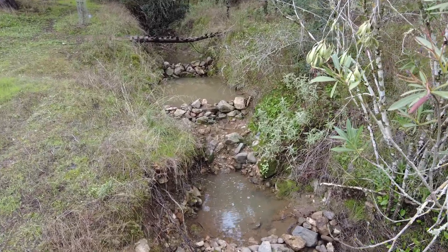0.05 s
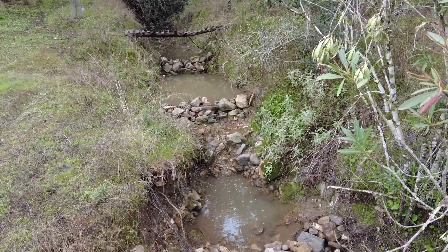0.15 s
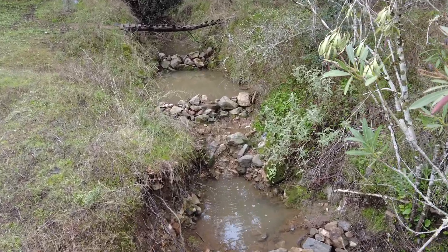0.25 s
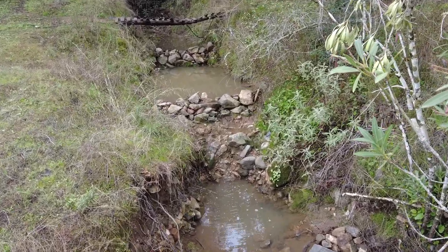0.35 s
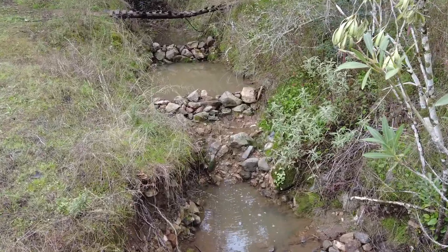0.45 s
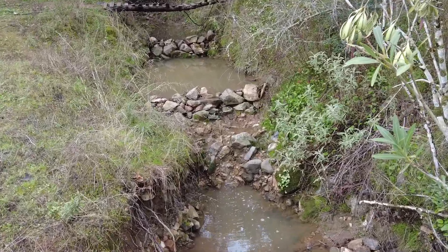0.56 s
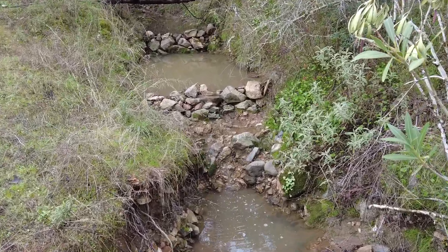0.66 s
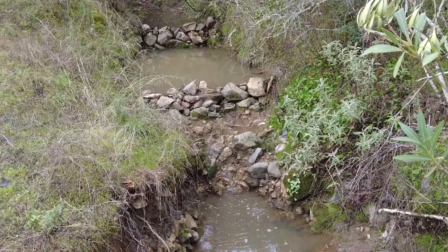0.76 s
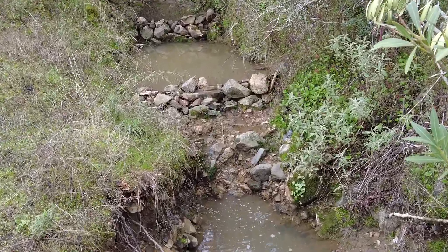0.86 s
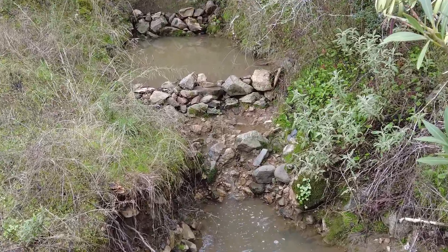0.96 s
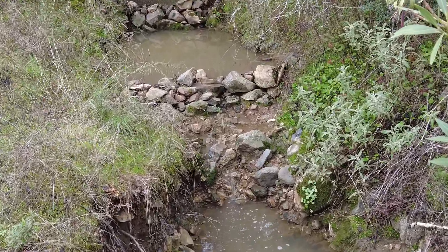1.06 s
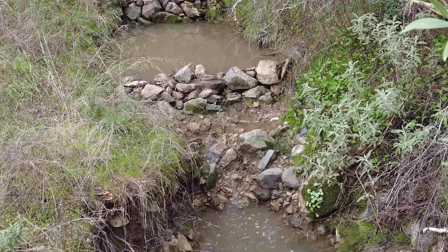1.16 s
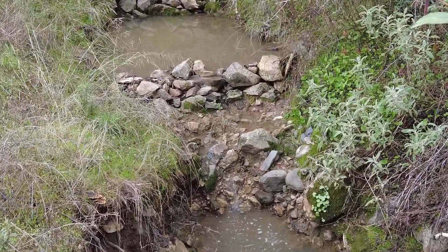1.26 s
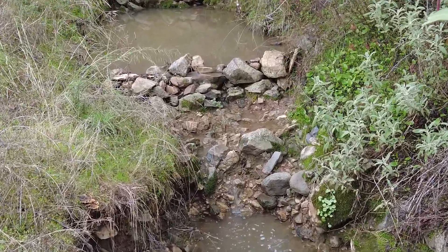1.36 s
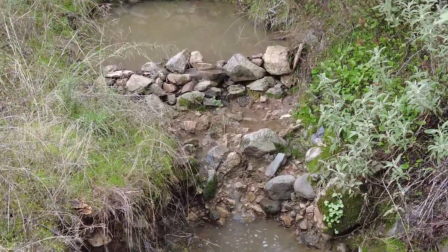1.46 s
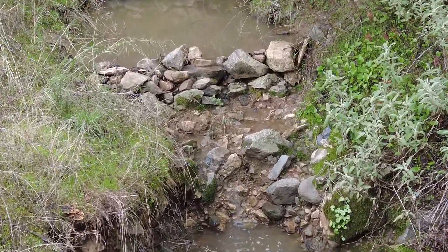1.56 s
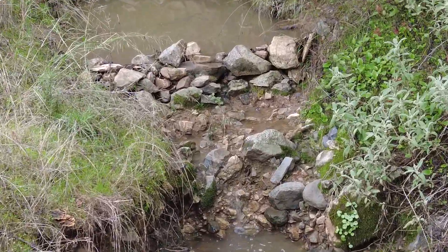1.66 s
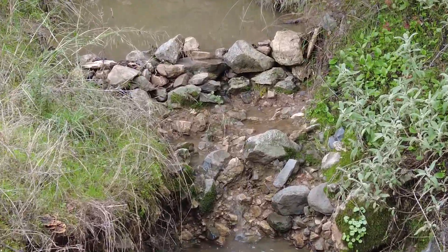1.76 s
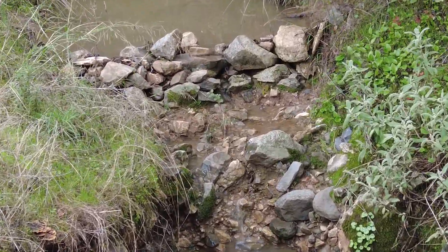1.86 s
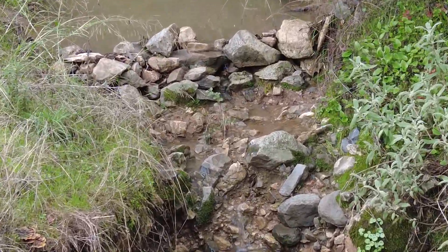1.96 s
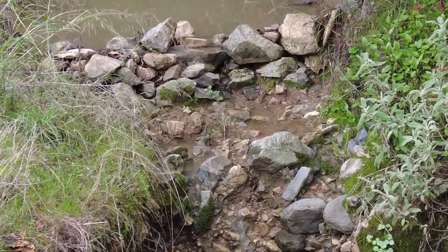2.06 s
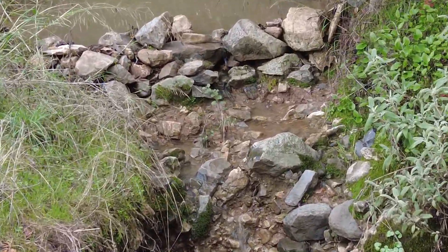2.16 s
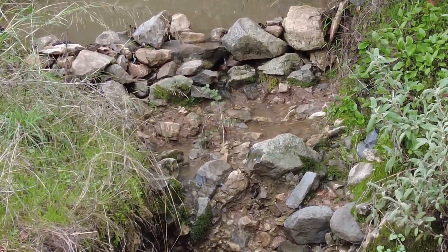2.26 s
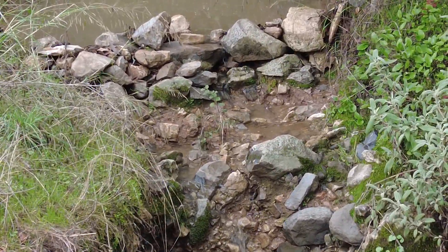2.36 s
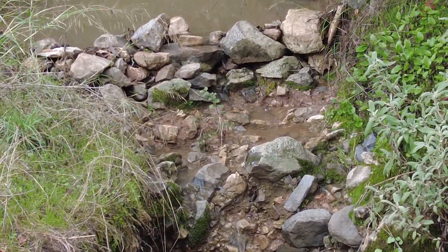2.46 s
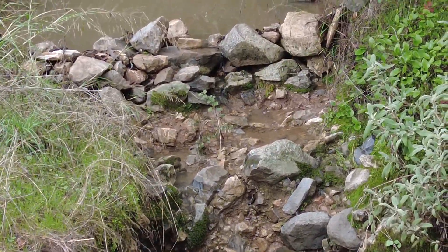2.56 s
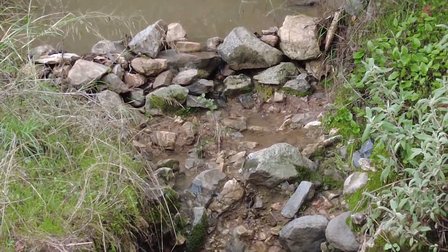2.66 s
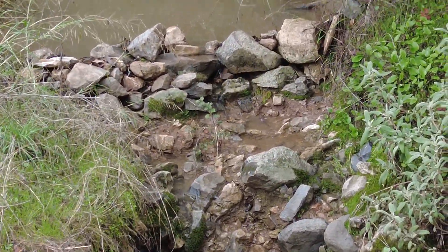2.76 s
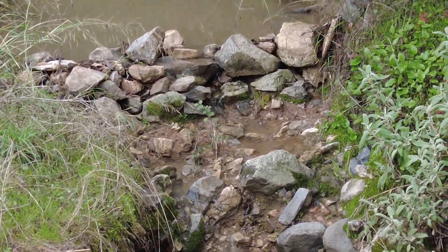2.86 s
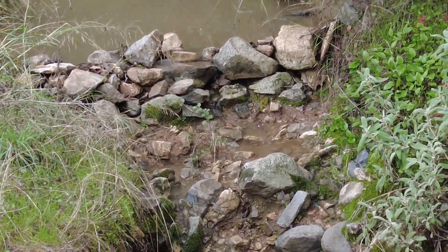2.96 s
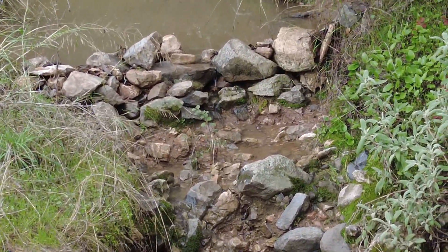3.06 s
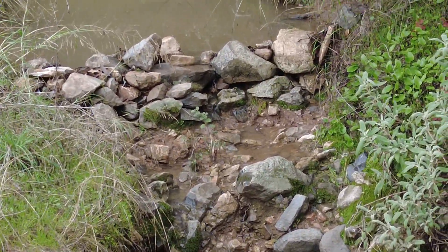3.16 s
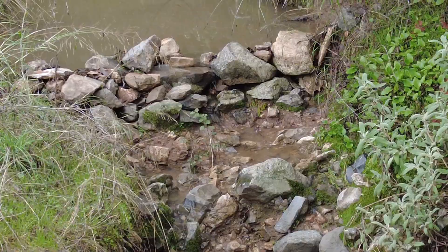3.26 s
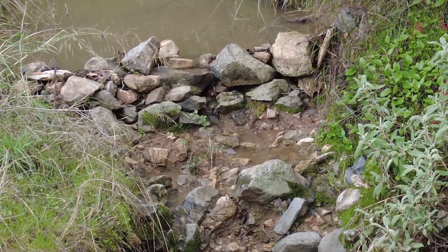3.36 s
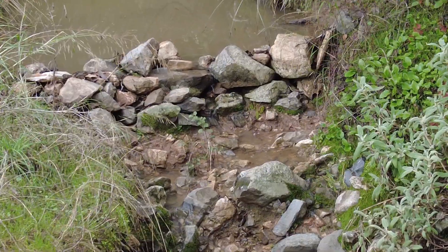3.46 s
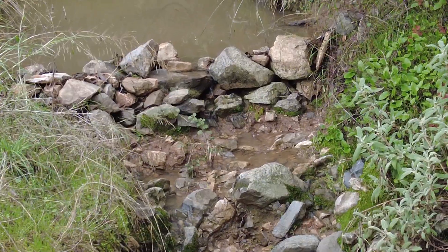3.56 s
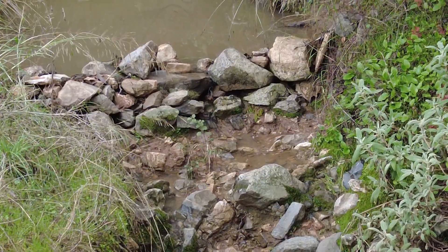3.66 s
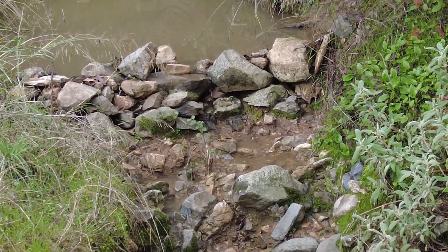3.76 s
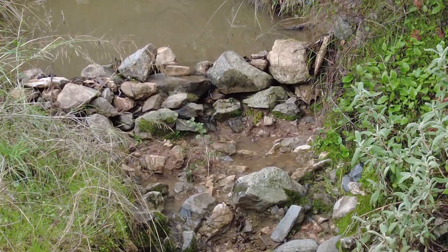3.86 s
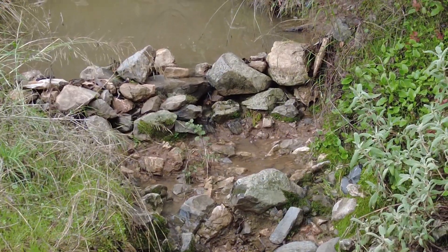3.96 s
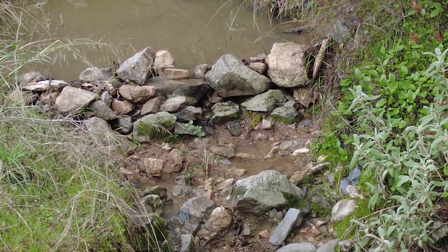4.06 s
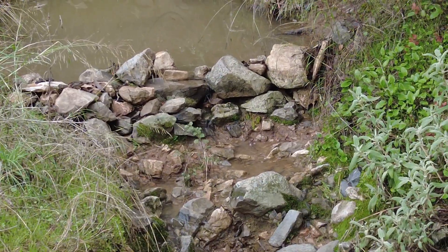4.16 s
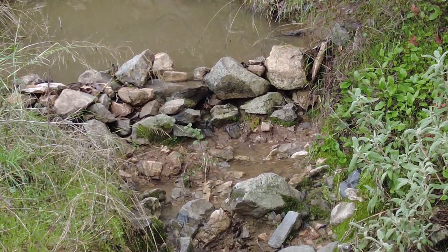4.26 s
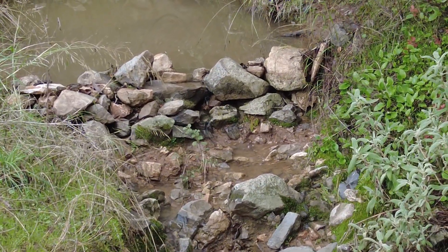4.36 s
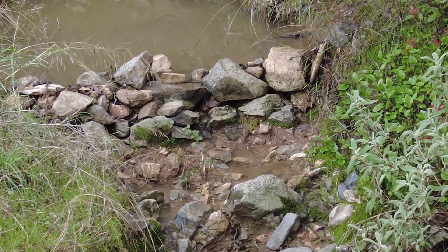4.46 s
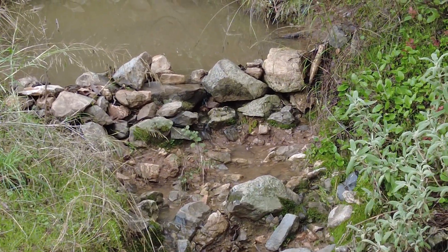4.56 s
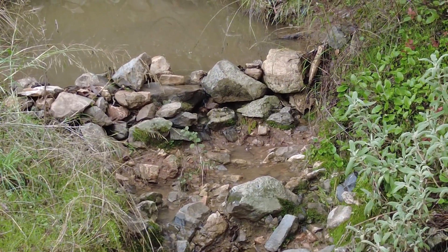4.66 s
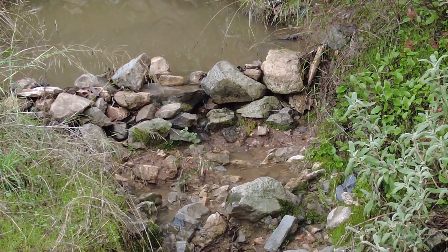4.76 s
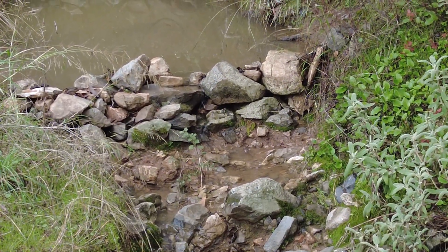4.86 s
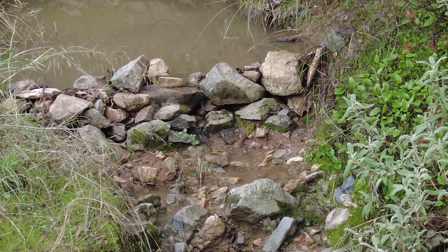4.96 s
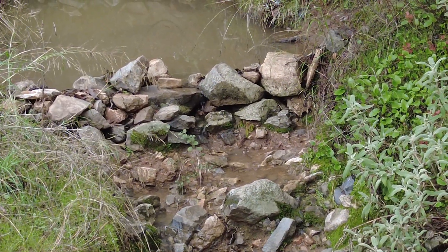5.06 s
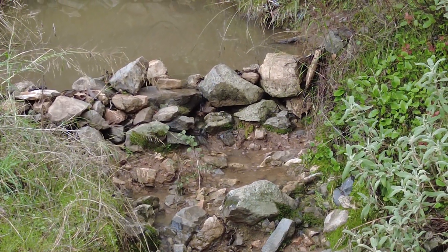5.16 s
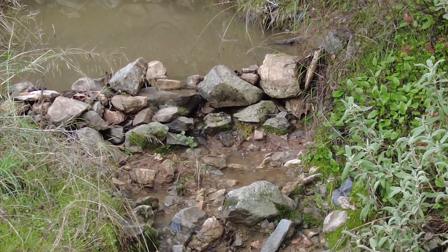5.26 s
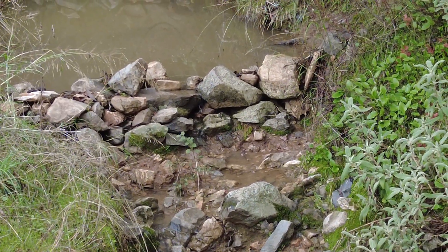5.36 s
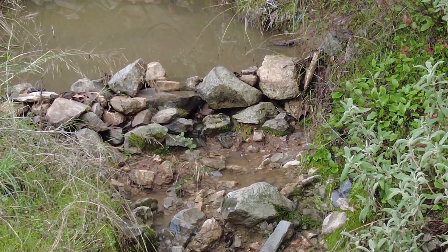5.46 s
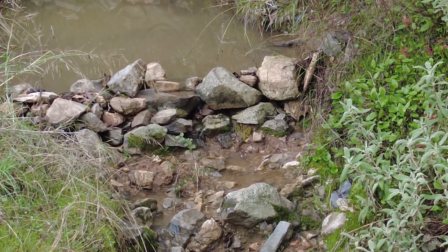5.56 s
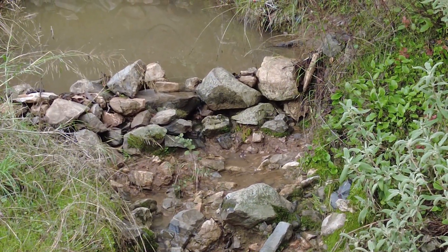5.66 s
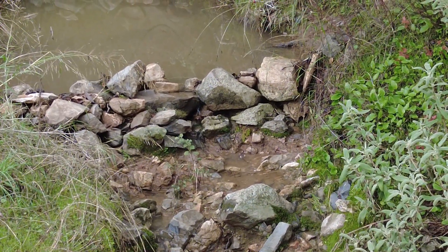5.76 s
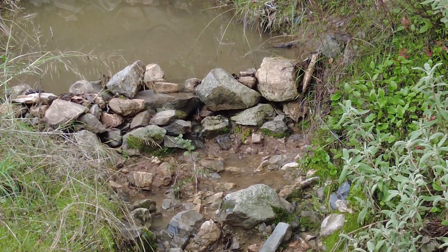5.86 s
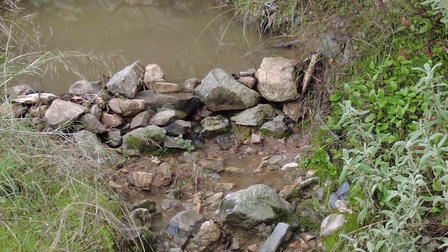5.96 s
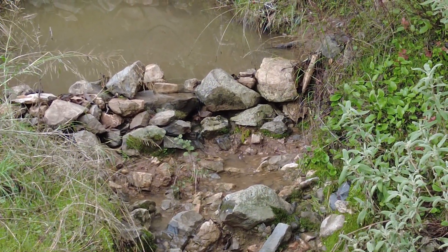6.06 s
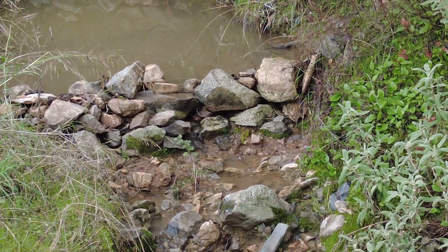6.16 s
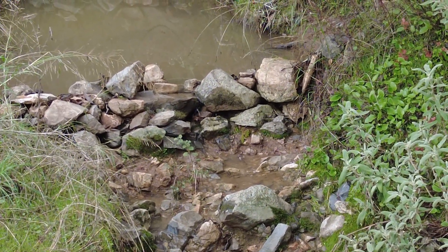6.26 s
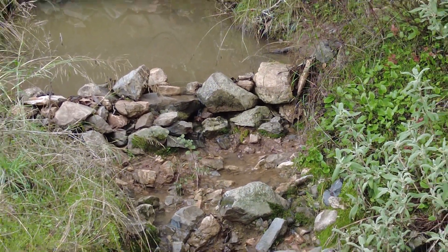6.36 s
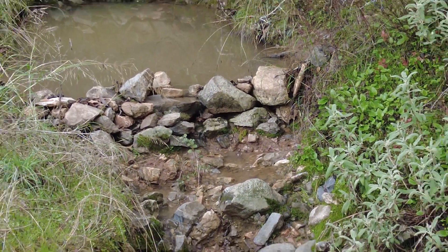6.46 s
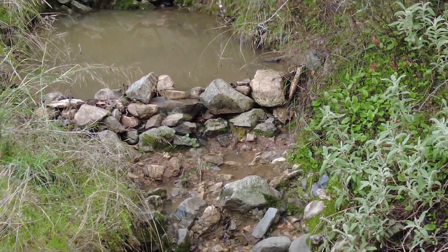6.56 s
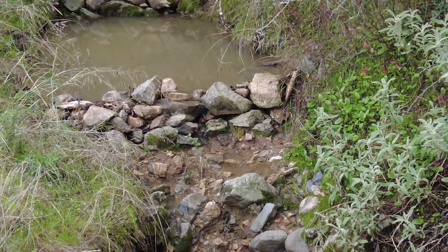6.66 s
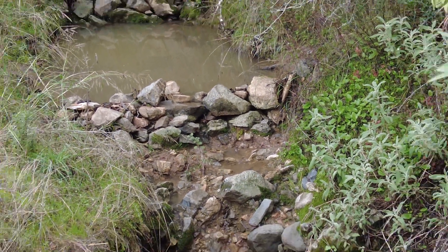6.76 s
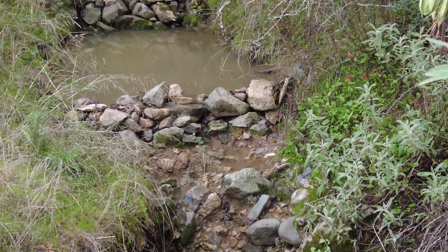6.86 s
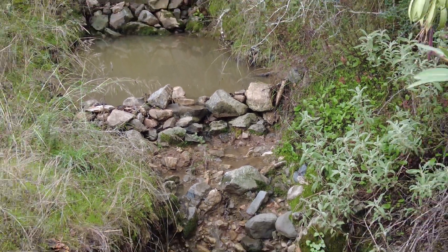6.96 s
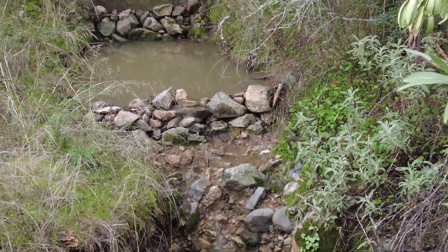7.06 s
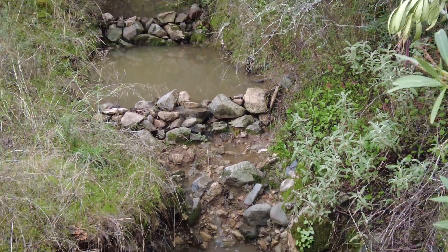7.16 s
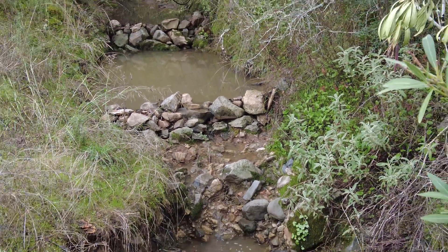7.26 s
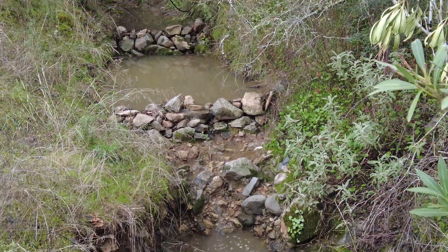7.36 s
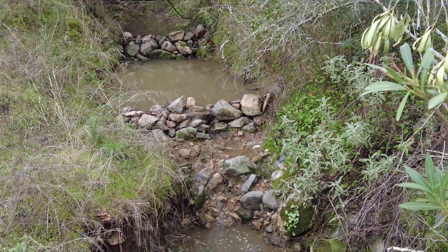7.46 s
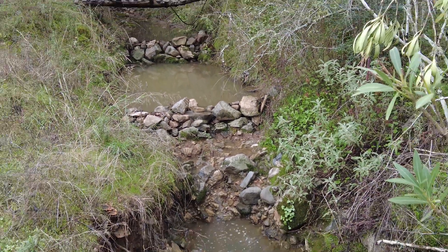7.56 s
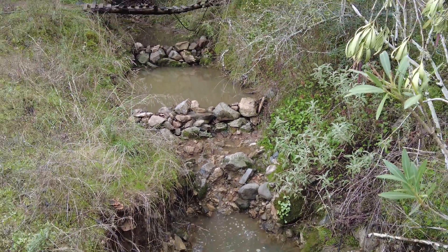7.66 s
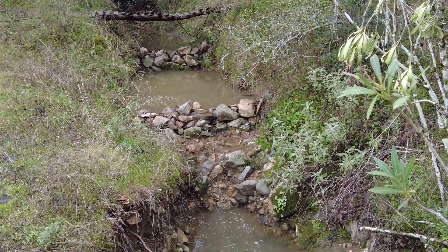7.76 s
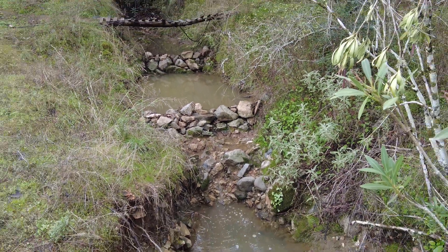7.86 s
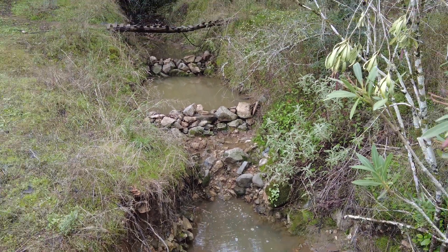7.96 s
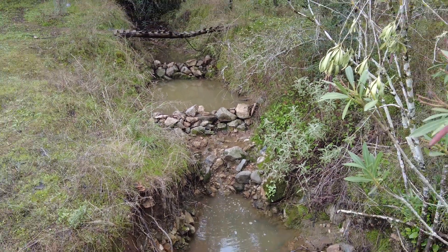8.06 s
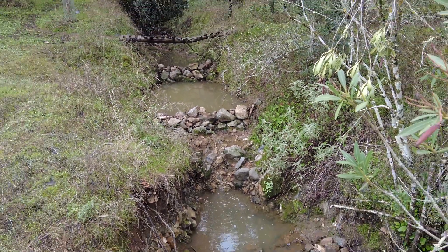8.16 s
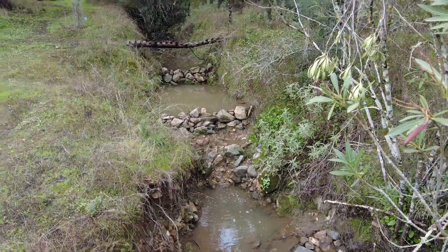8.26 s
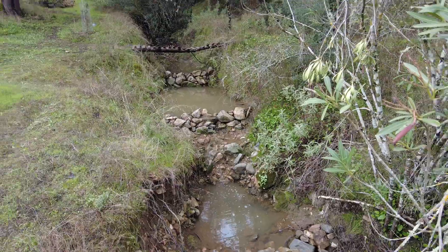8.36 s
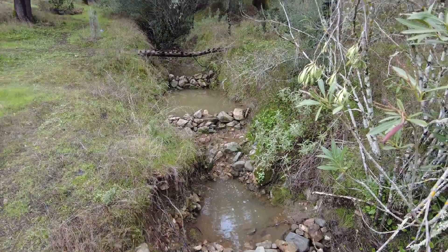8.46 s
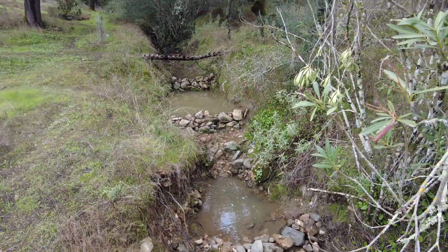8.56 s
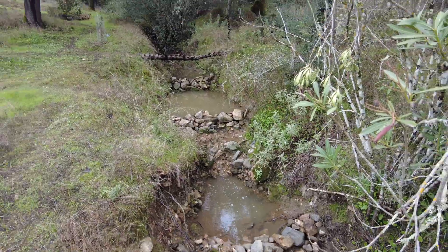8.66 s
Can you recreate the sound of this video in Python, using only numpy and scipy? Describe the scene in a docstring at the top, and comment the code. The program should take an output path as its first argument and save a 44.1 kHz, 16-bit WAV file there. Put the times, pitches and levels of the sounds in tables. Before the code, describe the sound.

A thin creek trickles through the stones of a low weir, swelling closer then fading away, with a camera's zoom drive whirring faintly.

```python
"""A thin creek trickles softly through the stones of a low rock weir, and a camera's zoom drive whirrs faintly.
As the camera zooms in the water grows louder, and as it zooms out the water fades again.
Trapped air bubbles ring with rising pitch among the stones; large ones shed smaller ones. Fine spray ticks.
Bursts of filtered noise make the drops that slap bare stone; two gliding sine notes make a far bird.
Behind them are a low outdoor rumble, two bumps on the camera and one puff of wind, made of noise and rings."""
import sys
import numpy as np
from scipy import signal
from scipy.fft import rfft, irfft, next_fast_len
from scipy.io import wavfile

SR = 44100
rng = np.random.default_rng(int(sys.argv[2]) if len(sys.argv) > 2 else 0)


def master_out(mix):
    """Clip the mix to full scale and print it as 16-bit PCM to the path in sys.argv[1]."""
    frames = np.transpose(np.atleast_2d(mix))
    ceiling = np.clip(frames, -1, 1)
    pcm = np.round(ceiling * 32767).astype(np.int16)
    wavfile.write(sys.argv[1], SR, pcm)


N = 384111  # length of the scene in samples

# levels when zoomed in, at an even flow
GURGLE_DB, TINKLE_DB, WASH_DB, SPRAY_DB = -53.5, -46.5, -48.5, -52
GURGLE_FOLLOWS, WASH_FOLLOWS = 0.76, 0.99  # dB for each dB of zoom and flow
# the air pocket under the fall grows and shrinks, and the pitch of the gurgles with it
POCKET_OCTAVES, POCKET_PER_S = 0.1485, 8.1
# the spray also arrives off the wet stone, this much later and weaker
GLANCE_S, GLANCE_SHARE = 0.000648, 0.38


def trickle(strength):
    """Slow gurgles, quick tinkling, fine spray and a wash, all fed by the same spurts of water."""
    surge = spurts(per_s=48, decay_s=.005, spread_db=4, steady=.9)
    # from afar the spurts even out and the hollows stand out less
    near = np.minimum(strength, 1) ** 0.4
    crowd = (surge / surge.mean()) ** near
    sprinkle = surge ** .6 * gain_of(7.5 * wander(per_s=80))
    pocket = 2 ** (POCKET_OCTAVES * wander(POCKET_PER_S))
    same_pitch = np.ones(N)

    gurgle_crowd = crowd * gain_of(4.5 * wander(per_s=10))
    gurgle = swarm(849.4, 1450, per_s=130, cycles=9.67, spread_db=3.0,
                   spurt=gurgle_crowd, apart=0.091, drift=pocket)
    tinkle_crowd = crowd * gain_of(3.2 * wander(per_s=50))
    tinkle = swarm(1400, 6410, per_s=950, cycles=6.47, spread_db=5.1,
                   spurt=tinkle_crowd, apart=0.3, drift=same_pitch)
    spray = swarm(4820, 16840, per_s=1250, cycles=4.4, spread_db=6.0,
                  spurt=sprinkle, apart=1.7, drift=same_pitch)
    spray = shaped(spray, lambda f: 1 + GLANCE_SHARE * np.exp(-2j * np.pi * f * GLANCE_S))

    # the wash is bubbles too small and many to tell apart
    wash = rng.standard_normal((2, N))
    wash = shaped(wash + 1.04 * wash[::-1], lambda f: f / (f + 1500))
    wash = wash * evened(sprinkle ** 0.29)

    tinkle = near * stones(tinkle) + (1 - near) * stones(tinkle, hollow_db=-6.0)
    wash = near * stones(wash) + (1 - near) * stones(wash, hollow_db=-6.0)
    return (gain_of(GURGLE_DB) * strength ** GURGLE_FOLLOWS * stones(gurgle)
            + gain_of(WASH_DB) * strength ** WASH_FOLLOWS * wash
            + strength * (gain_of(TINKLE_DB) * tinkle + gain_of(SPRAY_DB) * stones(spray)))


def spurts(per_s, decay_s, spread_db, steady):
    """Water tips over the stones in small gushes that well up quickly and die away, over a steady flow."""
    chance, size = rng.random((2, N))
    gush = (chance < per_s / SR) * gain_of(spread_db * np.minimum(-np.log(size), 2.5))
    gush = signal.lfilter([1], np.poly([np.exp(-1 / (decay_s * SR))] * 2), gush)
    return abs(steady) + gush / gush.mean()


def swarm(low_hz, high_hz, per_s, cycles, spread_db, spurt, apart, drift, size=20000):
    """Countless bubbles, each with its own pitch, ring and glide; they crowd together in spurts."""
    out = np.zeros((2, N))
    chances = rng.random((size, 7))[:int(per_s * N / SR)]
    moment, pitch, strength, damping, glide, phase, spot = chances.T
    # more bubbles start where the spurt is strong
    starts = np.searchsorted(np.cumsum(spurt) / np.sum(spurt), moment) / SR
    hz = low_hz * (min(high_hz, SR / 2) / low_hz) ** pitch
    hz = hz * np.interp(starts, np.arange(N) / SR, drift)
    gain = hz * gain_of(spread_db * np.minimum(-np.log(strength), 3.8))
    # small bubbles reach the two microphone ports further out of step
    skew = apart * np.sqrt(hz / high_hz) * (2 * spot - 1)
    ports = gain * np.exp(1j * (2 * np.pi * phase + skew * np.array([[1], [-1]])))
    lengths = cycles * 2 ** (2 * damping - 1)
    rises = 2 * RING_RISE * glide
    for s, f, length, rise, port in zip(starts, hz, lengths, rises, ports.T):
        add(out, s, (port[:, None] * bubble(f, length, rise)).real)
    return out


# colour of the water: pitch_hz, level_db
WATER_COLOUR = [(400, -26), (690, -33), (830, -13.5), (980, -8.5), (1260, -4), (1410, -16), (1750, -9),
                (2250, -7.5), (3300, -7.5), (3800, -14), (6500, -17.5), (9000, -20), (12000, -23),
                (16000, -26)]
# hollows between the stones that ring: pitch_hz, width_hz, level_db (before hollow_db is added)
HOLLOWS = [(1701, 177, -4.5), (2690, 213, -1.5), (4290, 232, -7.5), (4810, 62, -13), (7680, 740, -21.5)]


def stones(x, hollow_db=2.5, size=4096):
    """The hollows ring on after each bubble and colour it."""
    hz = abs(np.fft.fftfreq(size, 1 / SR))
    rings = sum(gain_of(db + hollow_db) ** 2 / (1 + (1.45 * (hz - f) / width) ** 2) ** 2
                for f, width, db in HOLLOWS)
    below = 1 / (1 + (850 / (hz + 1)) ** 12)  # the gaps are too small to hold deeper bubbles
    log_gain = np.log(gain_of(read(WATER_COLOUR, hz)) ** 2 + rings * below) / 2
    # minimum phase: the ringing only follows the sound, never comes ahead of it
    response = np.fft.ifft(np.exp(signal.hilbert(log_gain).conj())).real[:size // 2]
    return evened(signal.oaconvolve(x, response[None], axes=1)[:, :N])


# a 1 kHz plop swells for RING_S, higher ones are quicker; the pitch climbs by the share RING_RISE meanwhile
RING_S, RING_SLOPE, RING_RISE = 0.0044, 0.74, 0.057
# bubbles shed one after another: average gap, level step, and pitch scale (mostly higher)
SHED_GAP_S, SHED_DB, SHED_OCTAVES = 0.0083, -9, 0.12
# large bubbles that stand out of the trickle: start_s, level_db (peak, before lift_db), pitch_hz
BUBBLES = [(0.041, -43.5, 1220), (0.266, -46, 1180), (0.517, -40, 2700), (0.553, -42.5, 1216),
           (0.716, -45, 1140), (0.774, -40.5, 1150), (0.865, -41.5, 1680), (0.973, -37.5, 2960),
           (1.022, -44.5, 1660), (1.313, -37, 2080), (1.397, -45, 1010), (1.495, -39.5, 1630),
           (1.523, -38.5, 4330), (1.565, -37.5, 3050), (1.667, -33, 3270), (1.72, -49, 840),
           (1.789, -39.5, 1115), (1.962, -36.5, 1700), (1.992, -37, 1155), (2.114, -41.5, 890),
           (2.188, -30.5, 1190), (2.332, -33, 1170), (2.406, -27, 2730), (2.499, -32, 2850),
           (2.6, -33.5, 3470), (2.639, -29.5, 2690), (2.738, -29.5, 2660), (2.964, -36.5, 1180),
           (2.973, -24, 2750), (3.026, -27, 1700), (3.055, -31.5, 1820), (3.107, -35, 2110),
           (3.167, -33, 1920), (3.23, -47.5, 885), (3.284, -38, 1280), (3.515, -35.5, 1760),
           (3.535, -31.5, 1100), (3.813, -37, 1057), (3.841, -30, 1060), (3.967, -40.5, 840),
           (4.011, -36, 1010), (4.044, -27, 2650), (4.21, -32.5, 3140), (4.235, -23, 3250),
           (4.361, -35.5, 1020), (4.419, -32, 1034), (4.519, -32, 1165), (4.67, -34.5, 1080),
           (4.709, -35, 1060), (4.765, -30, 2670), (4.822, -27, 2740), (5.036, -29, 8060),
           (5.108, -32, 2680), (5.149, -33.5, 1097), (5.294, -28, 1120), (5.944, -36.5, 1070),
           (5.985, -36.5, 4000), (6.036, -37.5, 1164), (6.07, -37.5, 1025), (6.103, -36.5, 1233),
           (6.351, -31.5, 2690), (6.706, -32, 1052), (7.07, -45, 900), (7.122, -46, 860),
           (7.173, -44.5, 1230), (7.209, -35.5, 7250), (7.216, -42, 1780), (7.263, -33.5, 1264),
           (7.271, -38, 1650), (7.464, -40.5, 2850), (7.516, -43.5, 2300), (7.718, -43, 3220),
           (7.911, -43, 1170), (8.223, -52, 1170), (8.522, -50, 2740), (8.62, -43, 2890)]


def plops(lift_db=-0.5, count=3):
    """A large bubble rings, then sheds smaller ones in quick succession."""
    out = np.zeros(N)
    for s, db, hz in BUBBLES:
        cycles = hz * RING_S * (1000 / hz) ** RING_SLOPE
        for k, (phase, gap, size) in enumerate(rng.random((count, 3))):
            shed_hz = hz * 2 ** (SHED_OCTAVES * k * (2 * size - .5))
            ring = bubble(shed_hz, cycles, RING_RISE) * np.exp(2j * np.pi * phase)
            add(out, s, gain_of(db + lift_db + SHED_DB * k) * ring.real)
            s += SHED_GAP_S * (.5 + gap)
    return out


def bubble(hz, cycles, rise):
    """A complex ring of peak 1 swells over some cycles and dies away, its pitch climbing near the surface."""
    u = np.arange(int(3 * cycles / hz * SR) + 2) * hz / SR / cycles  # time, 1 at the peak
    turns = cycles * u * (1 + rise * (u / 2 - 1))
    return u ** 2 * np.exp(1 - u ** 2 + 2j * np.pi * turns)


SPLASH_DB, SPLASH_HZ = -15, 7500  # the splash that traps a large bubble; level against the bubble's table level
SLAP_CRACK_S, SLAP_OCTAVES = .0009, .7  # time to the crack's peak, width of its colour
# drops that slap bare stone: start_s, level_db (peak), centre_hz
SLAPS = [(0.213, -44, 8300), (0.876, -43, 8000), (1.463, -38.5, 10600), (1.569, -36, 4500),
         (1.669, -38, 8500), (2.069, -38, 12000), (2.109, -37, 6400), (2.409, -35, 9000),
         (2.495, -38, 7930), (2.57, -34.5, 10500), (2.719, -28.5, 9500), (2.817, -33.5, 13500),
         (3.288, -34.5, 10100), (4.365, -30, 4250), (4.371, -31, 9000), (5.1, -32, 8500),
         (6.471, -26, 6750), (6.483, -36, 6500), (7.288, -39, 10400), (8.248, -46, 12000)]


def slaps():
    """Drops burst on bare stone, and on the water where they trap a bubble."""
    out = np.zeros((2, N))
    for s, db, hz in SLAPS:
        add(out, s, slap(db, hz, SLAP_OCTAVES))
    for s, db, _ in BUBBLES:
        add(out, s, slap(db + SPLASH_DB, SPLASH_HZ, octaves=1.0))
    return out


def slap(db, hz, octaves, alike=0.34, mist=0.12, mist_s=0.0013):
    """A drop bursts: a sharp bright crack, then a brief hiss of mist."""
    t = np.arange(1400) / SR
    crack_shape = t / SLAP_CRACK_S * np.exp(-t / SLAP_CRACK_S)
    mist_shape = mist * t / mist_s * np.exp(-t / mist_s)
    burst = rng.standard_normal((2, len(t))) * (crack_shape + mist_shape)
    burst = burst + alike * burst[::-1]
    burst = shaped(burst, lambda f: 1 / (1 + (np.log2((f + 1) / hz) / octaves) ** 2))
    return gain_of(db) * burst / abs(burst).max()


# lead of the left microphone port over the right: pitch_hz, lead_radians
LEAD = [(500, 1), (1120, 0.95), (1900, 0.045), (12000, 0.85)]
# share of sound that the banks scatter back: pitch_hz, level_db
SCATTER = [(1000, -8.5), (3000, -8.5), (14000, -2)]


def banks(x, t60=0.1, turns_per_s=7, count=8):
    """Rocks and earth banks scatter a short tail; the two ports hear the sound slightly out of step."""
    t, tail = np.arange(SR // 6) / SR, np.zeros((2, N))
    for k in range(count):
        # the sound comes from spot after spot, each with its own echoes
        near = (np.arange(N) / SR * turns_per_s * count + k) % count
        window = np.sin(np.pi / 2 * np.minimum(near, 2))
        taps = rng.standard_normal((2, len(t))) * gain_of(-60 * t / t60) * (t > .003)
        taps = taps / np.linalg.norm(taps, axis=1, keepdims=True)
        tail += signal.oaconvolve(x * window, taps, axes=1)[:, :N]
    direct = shaped(x, lambda f: np.exp(.5j * read(LEAD, f) * np.array([[1], [-1]])))
    return direct + shaped(tail, lambda f: gain_of(read(SCATTER, f)))


WHIRR_ATTACK_S, WHIRR_SAG_DB_PER_S, WHIRR_RELEASE_DB_PER_S = 0.089, 10, 49
# runs of the zoom drive: start_s, length_s, level_db
ZOOM_RUNS = [(-.1, 0.7, -67.5), (1.416, 0.67, -65.5), (6.19, 0.8, -65), (7.37, 0.71, -62),
             (8.53, 0.44, -67.5)]
# colour of the drive: pitch_hz, level_db
WHIRR_COLOUR = [(100, -38), (190, -7.5), (250, 2), (410, -9), (600, -5.5), (1100, -19.5)]
# bumps on the camera body: start_s, level_db (peak), scuff_share (against the knock, 0-1)
BUMPS = [(2.941, -36.5, 0.3), (6.35, -45, 0.9)]
# ringing of the camera body: pitch_hz, level_db, t60_s (time to fall by 60 dB)
BODY = [(118, -15, 0.011), (244, -0.5, 0.057), (333, 7, 0.02), (644, 6.5, 0.018)]


def camera(scuff_s=0.0087, push=0.29, push_s=0.0018):
    """The zoom drive whirrs softly, and a finger knocks and scuffs the camera body."""
    out, t = np.zeros(N), np.arange(3000) / SR
    ring = sum(gain_of(db - 60 * t / t60) * np.sin(2 * np.pi * hz * t) for hz, db, t60 in BODY)
    for s, db, scuff_share in BUMPS:
        rub = t * np.exp(-t / scuff_s) * rng.standard_normal(len(t))
        scuff = signal.fftconvolve(ring, rub)[:len(t)]
        shove = np.gradient(t ** 2 * np.exp(-t / push_s))
        knock = evened(ring * (1 - np.exp(-t / 0.0014)))
        bump = knock + push * evened(shove) + scuff_share * evened(scuff)
        add(out, s, gain_of(db) * bump / abs(bump).max())
    drive = rng.standard_normal((2, N))
    running = sum(gain_of(db) * envelope(s, length, WHIRR_ATTACK_S, WHIRR_SAG_DB_PER_S, WHIRR_RELEASE_DB_PER_S)
                  for s, length, db in ZOOM_RUNS)
    whirr = evened(shaped(drive + drive[::-1] / 2, lambda f: gain_of(read(WHIRR_COLOUR, f))))
    return out + running * whirr


# whistles of a far bird: start_s, length_s, level_db (peak), pitch_hz (halfway), glide_hz_per_s
WHISTLES = [(2.177, 0.05, -53, 6720, 5000), (2.245, 0.059, -46.5, 6730, -4500)]


def bird():
    """A far bird's thin notes, each a sine gliding up or down."""
    out = np.zeros(N)
    for s, length, db, hz, glide in WHISTLES:
        t = np.arange(0, length, 1 / SR)
        cycles = np.cumsum(hz + glide * (t - length / 2)) / SR
        add(out, s, gain_of(db) * np.sin(np.pi * t / length) * np.sin(2 * np.pi * cycles))
    return out


# one puff of wind on the microphone
PUFF_START_S, PUFF_LENGTH_S, PUFF_DB = 7.335, .21, -50
PUFF_ATTACK_S, PUFF_SAG_DB_PER_S, PUFF_RELEASE_DB_PER_S = 0.0125, 32, 116
# colour of the outdoor rumble: pitch_hz, level_db
AIR_COLOUR = [(25, 12), (65, 10), (120, 3), (260, -0.5), (480, -4.5), (800, -12.5), (16000, -18)]
# colour of the puff: pitch_hz, level_db
PUFF_COLOUR = [(12, -31), (35, -2), (120, -20), (600, -54)]


def air(zoom):
    """Faint outdoor rumble, alike at both ports in the bass, and one puff of wind."""
    middle, side, wind = rng.standard_normal((3, N))
    side = shaped(side, lambda f: 0.016 + 0.86 * f ** 2 / (f ** 2 + 260 ** 2))
    both_ports = np.array([middle + side, middle - side])
    rumble = evened(shaped(both_ports, lambda f: gain_of(read(AIR_COLOUR, f))))
    # the zoom does not lift the deepest rumble
    deep = shaped(rumble, lambda f: 1 / (1 + (f / 120) ** 2))
    puff = evened(shaped(wind, lambda f: gain_of(read(PUFF_COLOUR, f))))
    puff = puff * envelope(PUFF_START_S, PUFF_LENGTH_S, PUFF_ATTACK_S, PUFF_SAG_DB_PER_S, PUFF_RELEASE_DB_PER_S)
    return gain_of(-65.5) * (deep + zoom ** 0.52 * (rumble - deep)) + gain_of(PUFF_DB) * puff


def envelope(start_s, length_s, attack_s, sag_db_per_s, release_db_per_s):
    """Rises, sags while it lasts, then dies away."""
    t = np.maximum(np.arange(N) / SR - start_s, 0)
    fall_db = sag_db_per_s * t + release_db_per_s * np.maximum(t - length_s, 0)
    return np.minimum(t / attack_s, 1) * gain_of(-fall_db)


def gain_of(db):
    """Turns decibels into a factor."""
    return 10 ** (np.asarray(db) / 20)


def evened(x):
    """Scales to an average strength (rms) of 1."""
    return x / np.sqrt(np.mean(x ** 2) + 1e-20)


def read(points, hz):
    """Reads a table over pitch, joined on a log-frequency axis."""
    f, value = np.transpose(points)
    return np.interp(np.log(hz + 1), np.log(f + 1), value)


def level(curve):
    """Turns a dB curve into a gain for every sample."""
    return gain_of(np.interp(np.arange(N) / SR, *np.transpose(curve)))


def add(mix, s, sound):
    """Mixes a sound in at time s, in seconds."""
    part = mix[..., max(round(s * SR), 0):][..., :sound.shape[-1]]
    part += sound[..., :part.shape[-1]]


def shaped(x, response):
    """Filters by a response given as a function of Hz."""
    size = next_fast_len(x.shape[-1] + 4096)
    spectrum = rfft(x, size) * response(np.fft.rfftfreq(size, 1 / SR))
    return irfft(spectrum, size)[..., :x.shape[-1]]


def wander(per_s):
    """A smooth random curve of rms 1; a higher per_s wanders faster."""
    return evened(shaped(rng.standard_normal(N), lambda f: np.exp(-(f / per_s) ** 2)))


# the water comes closer as the camera zooms in, holds and zooms out: time_s, level_db
ZOOM = [(0.0, -12), (.65, -13), (1.0, -8.5), (1.75, -4.5), (2.05, 2), (6.4, -1.5), (6.85, -2.5),
        (7.1, -8.5), (8.15, -13.5), (8.7, -15.5)]
# the flow over the weir swells and ebbs: time_s, level_db
FLOW = [(2.45, -4.5), (2.76, -2.5), (3.3, -3), (3.75, -3.5), (4.12, -4.5), (4.3, -1.5), (4.64, 0),
        (4.92, -4), (5.12, 1), (5.55, -3), (6.1, -0.5), (6.55, -2)]


def scene():
    """The water and the bird between the banks, the camera and the air."""
    zoom = level(ZOOM)
    strength = zoom * level(FLOW)
    between_banks = trickle(strength) + plops() + slaps() + bird()
    return banks(between_banks) + camera() + air(zoom)


EDGE_HZ = 15900  # highest pitch that the recorder keeps


def record(dry):
    """The recorder's band limit takes away the sound above its edge."""
    lowpass = signal.firwin(511, EDGE_HZ, window=("kaiser", 9), fs=SR)
    return signal.oaconvolve(dry, lowpass[None], "same", axes=1)


dry = scene()
out = record(dry)
master_out(out)
```